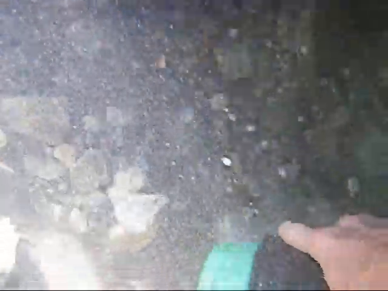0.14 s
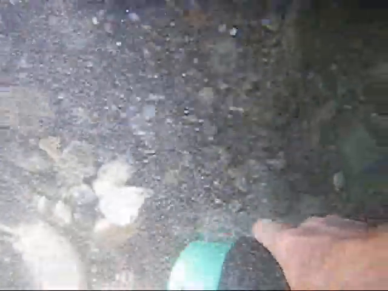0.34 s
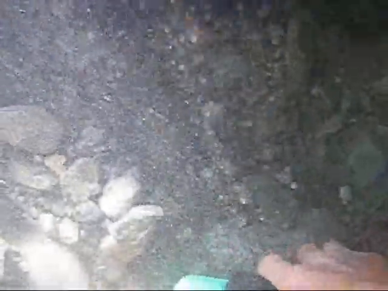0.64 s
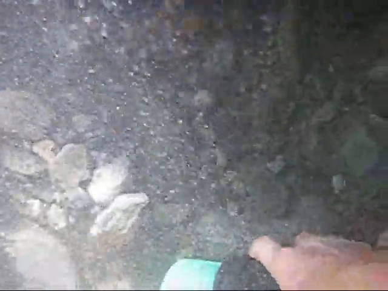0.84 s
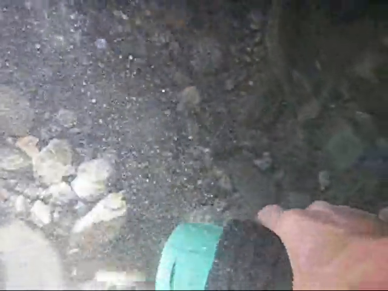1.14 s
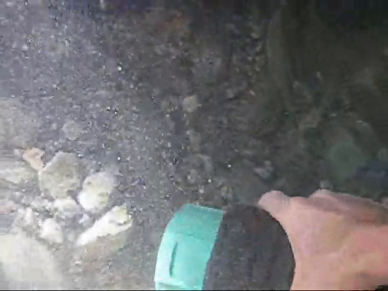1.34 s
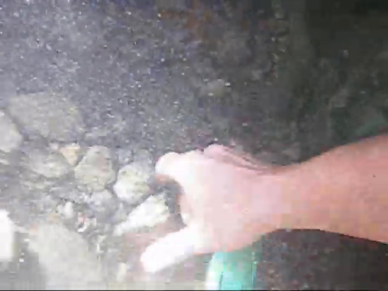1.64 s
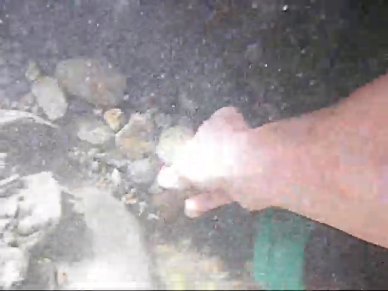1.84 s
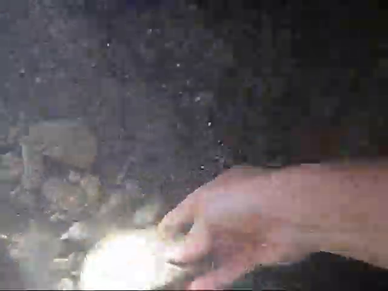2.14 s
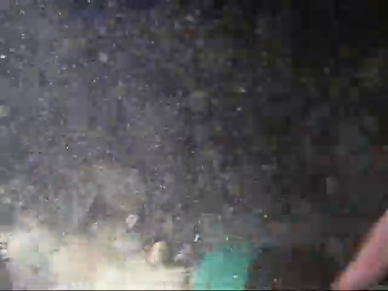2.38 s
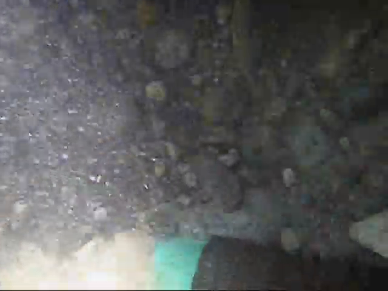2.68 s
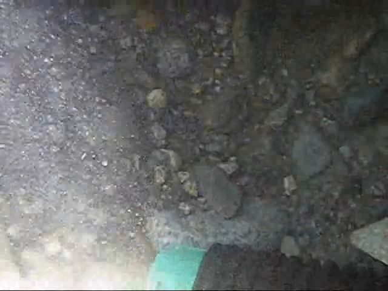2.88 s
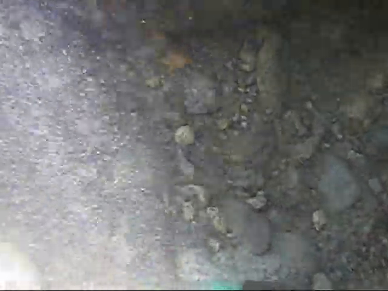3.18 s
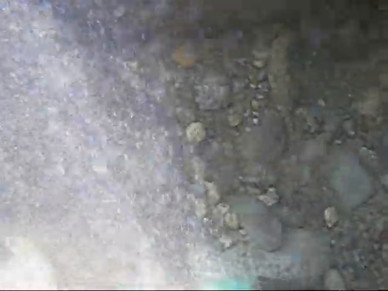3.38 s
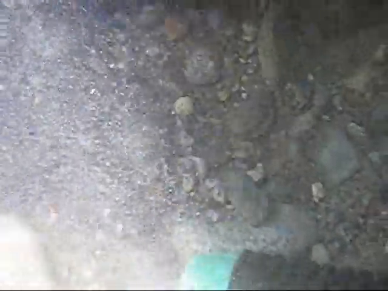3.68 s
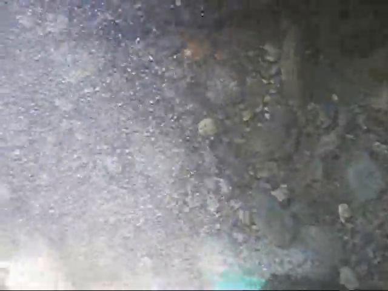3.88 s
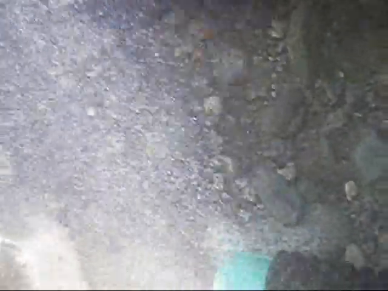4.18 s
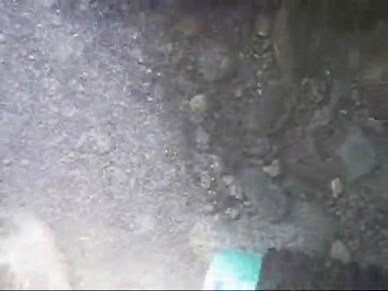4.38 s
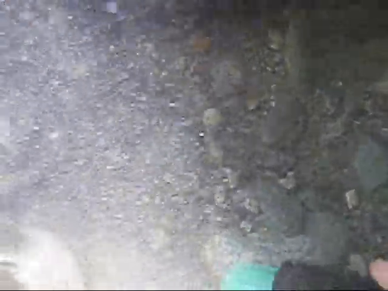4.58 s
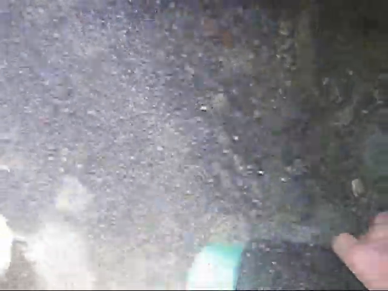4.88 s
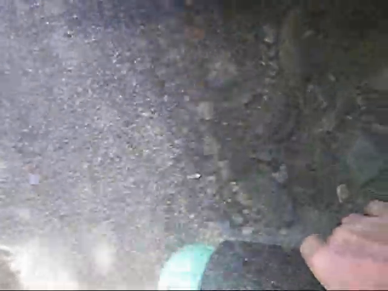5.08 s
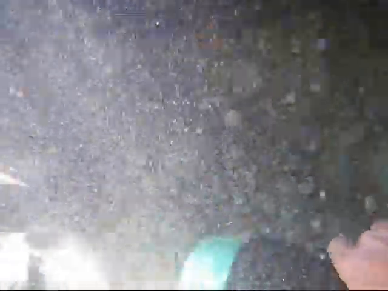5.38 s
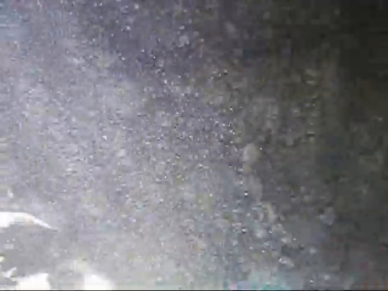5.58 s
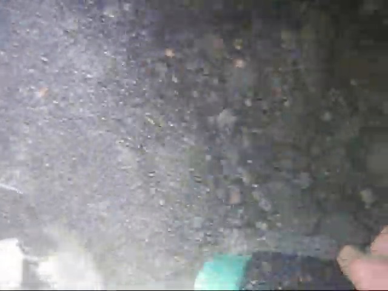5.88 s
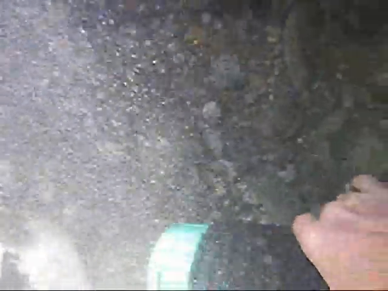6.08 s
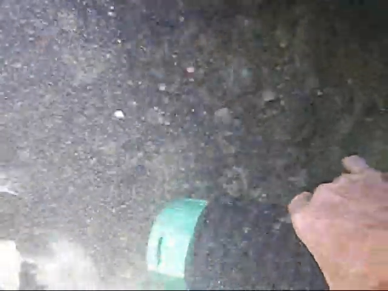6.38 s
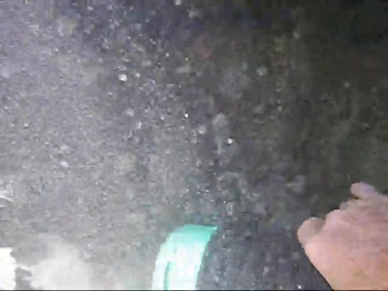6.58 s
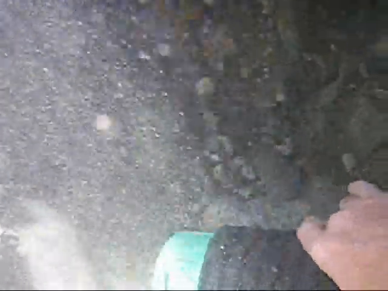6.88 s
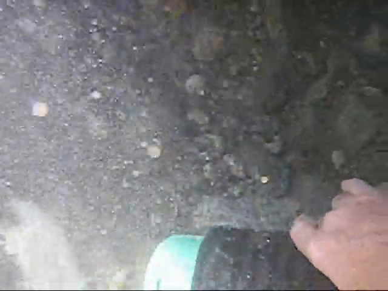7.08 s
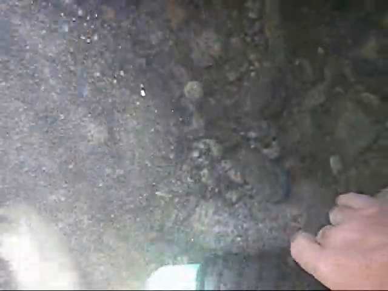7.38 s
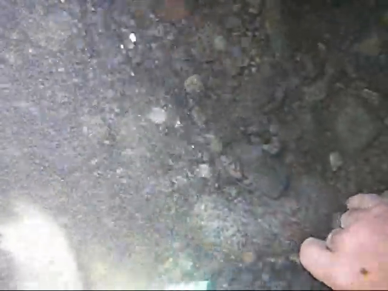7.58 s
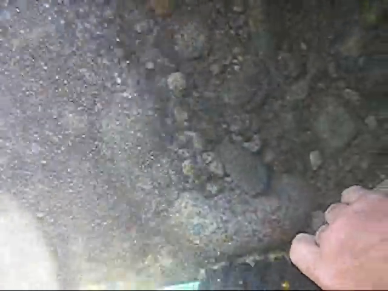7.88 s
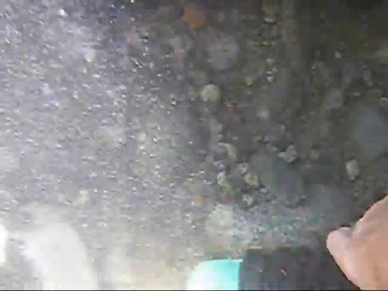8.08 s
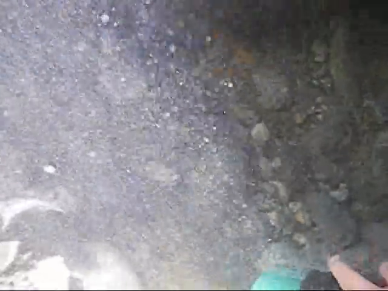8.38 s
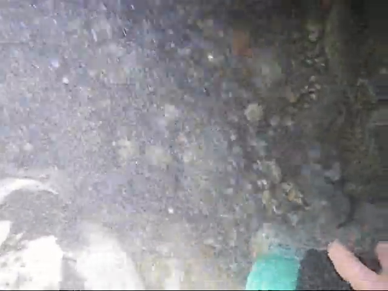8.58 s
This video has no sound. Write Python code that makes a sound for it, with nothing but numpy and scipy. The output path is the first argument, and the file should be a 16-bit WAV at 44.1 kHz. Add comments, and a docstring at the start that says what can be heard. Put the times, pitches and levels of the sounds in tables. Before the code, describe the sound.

Steady submerged suction roars and sloshes through a hose, sand hissing along its wall, with frequent hard stone knocks and sharp pebble ticks.

```python
"""Under water at the mouth of a dredge hose in a creek, heard through a camera's waterproof case.
From the start, random blows ring as the drone, sand and slosh of the flow, over short blips of bubbles and grit.
Stones knock and pebbles click from 0.1 s on, as swelling tones and struck resonances; air glugs from 1 s.
Last, peaks duck the camera's fast gain control, and its coarse sampling adds a glassy fizz."""
import sys
import numpy as np
from scipy import signal
from scipy.fft import rfft, irfft
from scipy.io import wavfile
from scipy.ndimage import uniform_filter1d

SR = 44100
rng = np.random.default_rng(int(sys.argv[2]) if len(sys.argv) > 2 else 0)


def wav_out(sig):
    """Save sig, one row per channel (or a flat mono array), as 16-bit PCM at SR to the path in sys.argv[1]."""
    wavfile.write(sys.argv[1], SR, np.round(np.clip(np.atleast_2d(sig).T, -1, 1) * 32767).astype(np.int16))


N = 385419
TIME_S = np.arange(N) / SR

# What the intake swallows. Each row: time in seconds, relative sand level in dB, relative churn level in dB.
INTAKE_LEVELS = [(0.0, -22, -24.5), (0.8, -23.5, -24), (1.28, -23, -24), (1.92, -24.5, -22.5),
                 (2.16, -23, -26.5), (3.44, -27.5, -31), (3.84, -23.5, -26.5), (4.0, -26.5, -32),
                 (4.4, -25.5, -25), (4.56, -27, -30.5), (4.96, -23.5, -21.5), (5.2, -24, -26.5),
                 (6.16, -27, -29), (6.72, -22, -26), (7.28, -29.5, -30.5), (7.6, -24.5, -25.5),
                 (8.4, -27, -24), (8.72, -22, -25)]
# Hardest stones on the nozzle. Each row: start in seconds, relative force in dB, pitch in Hz,
# choking of the intake in dB (negative: the flow rises).
STONE_KNOCKS = [(0.1047, 9.5, 705, 8), (0.231, 10.5, 736, 1), (0.401, 5, 515, -0.5), (0.583, 8, 770, 1.5),
                (0.7576, 6.5, 680, 2.5), (0.8875, 4, 646, 5), (1.4365, 7.5, 556, 1.5),
                (1.5222, 6.5, 622, 3.5), (1.6607, 11, 630, -5), (1.8785, 5.5, 563, 4.5),
                (1.9629, 4, 630, 0), (2.4283, 7.5, 680, -0.5), (2.4945, 5.5, 610, -1),
                (2.5327, 3.5, 915, 1.5), (2.7612, 7, 650, -4), (2.8687, 6.5, 654, 0.5),
                (2.9195, 4.5, 625, 2), (3.1106, 4.5, 630, 3), (3.2244, 6, 586, -1), (3.7201, 7, 644, -4),
                (3.9435, 2.5, 625, 3.5), (3.9541, 4, 670, 0), (4.5695, 9, 680, 5), (5.1169, 6.5, 646, 1),
                (5.3398, 6, 650, -0.5), (5.428, 5.5, 637, 5), (6.0296, 9.5, 750, -2.5),
                (6.2575, 3, 630, 1.5), (6.4633, 5.5, 680, 0.5), (6.502, 6, 795, -0.5),
                (6.7445, 6, 680, -0.5), (6.9099, 9, 615, -2.5), (7.0128, 7.5, 550, 2.5),
                (7.2273, 4.5, 618, -1), (7.7607, 6.5, 650, 4.5), (8.352, 6, 604, 2), (8.435, 5.5, 660, 2.5)]
# Loudest pebbles clicking in the hose. Each row: start in seconds, level in dB.
PEBBLE_CLICKS = [(0.1032, -7), (0.196, -17), (1.224, -6), (1.266, -7), (1.351, -5.5), (1.591, -9),
                 (1.6564, -4), (2.116, -4), (2.168, -8), (2.241, -22), (2.335, -10), (2.4998, -1.5),
                 (2.71, -7.5), (3.714, -3), (3.911, 1.5), (4.0153, -10), (5.1025, -6), (6.4606, -8),
                 (6.727, -9), (6.8952, -5), (7.095, -12), (7.423, -8), (7.5307, -9)]
# Largest pockets of air. Each row: start in seconds, relative level in dB, pitch at full swell in Hz.
AIR_GLUGS = [(0.955, -1, 277), (1.41, 2, 211), (1.754, -10, 245), (1.871, -2, 263), (2.266, -8, 246),
             (3.365, -5, 246), (4.846, -8, 198), (4.975, 2, 257), (5.002, 8.5, 280), (7.859, -3, 201)]
# Resonance of the case under the flow. Each row: frequency in Hz, relative gain in dB.
DRONE_COLOUR = [(300, -44), (370, -41), (450, -13), (550, 0), (635, 1), (720, -4.5), (840, -11.5),
                (970, -13), (1100, -21), (1280, -32), (1600, -51), (2500, -70.5)]
# Resonance of the hose wall under grains and pebbles. Each row: frequency in Hz, relative gain in dB.
SAND_COLOUR = [(500, -22.5), (1000, -2.5), (1350, -15), (1480, -7), (1590, -3.5), (1740, -13.5), (2070, -4),
               (2200, -10.5), (2390, 5.5), (2600, 4), (2820, 4.5), (3400, 2), (3850, -5.5), (4500, -16.5)]
# Resonance of the water column in the hose. Each row: frequency in Hz, relative gain in dB.
CHURN_COLOUR = [(15, -36), (70, -71), (100, -25.5), (140, -21.5), (195, -13.5), (225, -6), (258, 0.5),
                (305, -4), (345, -18), (450, -20), (900, -67)]
# Colour of the creek's rumble. Each row: frequency in Hz, relative gain in dB.
RUMBLE_COLOUR = [(10, 19), (30, -30), (70, -42), (110, 13), (180, 14), (400, -15)]

FLOW_DB, GRIT_DB, SLOSH_DB = -16, 0.72, -4  # the last two add to the intake's levels
FLOW_SURGE_HZ, GRIT_SURGE_HZ, SLOSH_SURGE_HZ = 29, 41.4, 30  # approximate upper limits
FLOW_SURGE_DB, GRIT_SURGE_DB, SLOSH_SURGE_DB = 1.15, 1.6, 2.0  # rms
CHOKE_PEAK_S = 0.025  # from strike to deepest choking
GRIT_CHOKE_SHARE = 0.79
KNOCK_SWELL_CYCLES = 1.5
GLUG_SWELL_S = 0.0074
SAMPLING_HZ = 8000
STEP_REPEATS = 12
TOP_EDGE_HZ = 15725


def gain_of(db):
    """Decibels to amplitude."""
    return 10 ** (np.asarray(db) / 20)


def evened(x):
    """Scales to an rms of one."""
    return x / np.sqrt(np.mean(x ** 2) + 1e-20)


def add(mix, start_s, sound):
    """Mixes a sound in at start_s, cut off at the end of the mix."""
    part = mix[max(round(start_s * SR), 0):][:len(sound)]
    part += sound[:len(part)]


def wander(top_hz):
    """Random drift of rms one, little of it faster than top_hz."""
    hz = np.fft.rfftfreq(N, 1 / SR)
    spectrum = rfft(rng.standard_normal(N))
    return evened(irfft(spectrum * np.exp(-(hz / top_hz) ** 2), N))


def swell_shape(u):
    """Swell and decay, peaking at one where u is one."""
    return (u * np.exp(1 - u)) ** 2


def response(colour, size=8192):
    """Minimum-phase ringing of a body of the given colour after one push, with a peak of one."""
    colour_hz, colour_db = np.transpose(colour)
    hz = abs(np.fft.fftfreq(size, 1 / SR))
    db = np.interp(np.log(hz + 1), np.log(colour_hz), colour_db)
    log_gain = np.log(gain_of(db))
    tail = np.fft.ifft(np.exp(signal.hilbert(log_gain).conj())).real[:size // 2]
    return tail / abs(tail).max()


def ring(x, colour):
    """Sends x through a body of the given colour; the result has an rms of one."""
    return evened(signal.oaconvolve(x, response(colour))[:N])


def impacts(per_s, spread_db):
    """Random train of blows of unequal size and either sign, with an rms of one."""
    size = gain_of(spread_db * np.minimum(rng.exponential(1, N), 4))
    sign = rng.choice([-1, 1], N)
    struck = rng.random(N) < per_s / SR
    return evened(size * sign * struck)


def blows(rows, level_db, rise):
    """Tones that swell and die within a few cycles; pitch climbs by the share rise per swell time."""
    out, t_s = np.zeros(N), TIME_S[:SR // 16]
    for start_s, db, hz, swell_s in rows:
        u = t_s / swell_s
        pitch_hz = hz * (1 + rise * (np.minimum(u, 4) - 1))  # the climb stops after four swell times
        turns = np.cumsum(pitch_hz) / SR + rng.random()
        add(out, start_s, gain_of(db + level_db) * swell_shape(u) * np.sin(2 * np.pi * turns))
    return out


def blips(level, level_db, hz, scatter, swell_s, spread_db, count):
    """Short blips at random times, each of its own pitch, size and length."""
    when, size, pitch, length = rng.random((count, 4)).T
    start_s = when * N / SR
    pitch_hz = hz * (1 + scatter * (2 * pitch - 1))
    rows = zip(start_s, spread_db * size, pitch_hz, swell_s * (.5 + length))
    return gain_of(level_db) * level * evened(blows(rows, level_db=0, rise=0.026))


def low_cut(x, corner_hz, order):
    """The stiff case passes little below its corner."""
    return signal.sosfilt(signal.butter(order, corner_hz, "high", fs=SR, output="sos"), x)


def suction():
    """Gains of flow, sand and churn: random surges, and a sag or rise as each stone chokes the intake."""
    time_s, sand_db, churn_db = np.transpose(INTAKE_LEVELS)
    choke_db = np.zeros(N)
    choke_shape = swell_shape(TIME_S[:SR // 4] / CHOKE_PEAK_S)
    for start_s, _, _, depth_db in STONE_KNOCKS:
        add(choke_db, start_s, depth_db * choke_shape)
    flow_db = FLOW_DB + FLOW_SURGE_DB * wander(FLOW_SURGE_HZ) - choke_db
    grit_db = GRIT_DB + GRIT_SURGE_DB * wander(GRIT_SURGE_HZ)
    grit_db += np.interp(TIME_S, time_s, sand_db) - GRIT_CHOKE_SHARE * choke_db
    slosh_db = SLOSH_DB + SLOSH_SURGE_DB * wander(SLOSH_SURGE_HZ)
    slosh_db += np.interp(TIME_S, time_s, churn_db) - choke_db
    return gain_of([flow_db, grit_db, slosh_db])


def rumble(level_db=-58):
    """The creek's faint, even rumble: coloured noise."""
    return gain_of(level_db) * ring(rng.standard_normal(N), RUMBLE_COLOUR)


def drone(level, level_db=1.04, gust_db=1.5):
    """Eddies and tumbling gravel keep the case's main resonance ringing."""
    push = impacts(per_s=1800, spread_db=1.1) * gain_of(gust_db * wander(top_hz=55))
    return gain_of(level_db) * level * ring(push, DRONE_COLOUR)


def churn(level, level_db=0.5, surge_db=1.5):
    """The column of water in the hose sloshes at a low pitch."""
    push = impacts(per_s=700, spread_db=2.5) * gain_of(surge_db * wander(top_hz=25))
    return gain_of(level_db) * level * ring(push, CHURN_COLOUR)


def sand(level, level_db=-2.65, clump_db=1.0):
    """Fine grains scour the hose wall in clumps of a few milliseconds."""
    grains = impacts(per_s=3000, spread_db=2.0) * gain_of(clump_db * wander(top_hz=110))
    return gain_of(level_db) * level * ring(grains, SAND_COLOUR)


def bubbles(flow, slosh):
    """Bubbles swept in at random, each a short blip rising a little in pitch."""
    deep = blips(slosh, level_db=-1.5, hz=470.5, scatter=0.079, swell_s=0.006, spread_db=10, count=200)
    large = blips(flow, level_db=-1.44, hz=602, scatter=.12, swell_s=0.0051, spread_db=4, count=600)
    small = blips(flow, level_db=-12.0, hz=897, scatter=0.11, swell_s=0.003, spread_db=7, count=200)
    return deep + large + small


def coarse_grit(level):
    """Coarse grains swept in at random, each a very short, high blip."""
    return blips(level, level_db=-10.0, hz=2953, scatter=0.18, swell_s=0.0011, spread_db=30, count=900)


def small_pebbles(level, level_db=-8.5):
    """Many lesser pebbles tick on the hose wall at random, carried along with the sand."""
    return gain_of(level_db) * level * ring(impacts(per_s=70, spread_db=3.0), SAND_COLOUR)


def small_stones(level):
    """Lesser stones knock at random, each a short blip through the case."""
    taps = blips(level, level_db=-12.0, hz=680, scatter=0.15, swell_s=0.0018, spread_db=14, count=45)
    return low_cut(taps, corner_hz=337, order=3)


def glugs():
    """Round, low bubbles that rise a little in pitch."""
    rows = [(*row, GLUG_SWELL_S) for row in AIR_GLUGS]
    return low_cut(blows(rows, level_db=-10.0, rise=0.037), corner_hz=98, order=3)


def pebbles(scrape_db=-14, scrape_s=0.0058):
    """Each pebble strikes the hose wall and scrapes on briefly, ringing it as the sand does."""
    push, t_s = np.zeros(N), TIME_S[:SR // 80]
    for start_s, db in PEBBLE_CLICKS:
        strike = t_s == 0
        scrape = gain_of(scrape_db) * np.exp(-t_s / scrape_s) * rng.standard_normal(len(t_s))
        add(push, start_s, gain_of(db) * (strike + scrape))
    return signal.oaconvolve(push, response(SAND_COLOUR))[:N]


def knocks():
    """Hard, short knocks of stone on the nozzle; the higher the pitch, the quicker the knock."""
    rows = [(start_s, db, hz, KNOCK_SWELL_CYCLES / hz) for start_s, db, hz, _ in STONE_KNOCKS]
    return low_cut(blows(rows, level_db=-5.0, rise=0), corner_hz=367, order=3)


def scene():
    """The intake's flow with its bubbles, grit, glugs, clicks and knocks."""
    flow, grit, slosh = suction()
    water = rumble() + drone(flow) + churn(slosh) + bubbles(flow, slosh)
    grains = sand(grit) + coarse_grit(grit) + small_pebbles(grit)
    strikes = small_stones(flow) + pebbles() + knocks()
    return (water + grains + glugs() + strikes)[None]


def gain_control(x, threshold_db=-6.5, share=0.8, recovery_db_per_s=125, attack_s=0.0018, makeup_db=1.0):
    """Peaks pull the gain down within milliseconds; it creeps back over a few hundredths of a second."""
    peak_db = 20 * np.log10(abs(x) + 1e-9)
    fall_db = TIME_S * recovery_db_per_s
    held_peak_db = np.maximum.accumulate(peak_db + fall_db) - fall_db
    over_db = np.maximum(held_peak_db - threshold_db, 0)
    r = np.exp(-1 / (attack_s * SR))
    smooth_over_db = signal.lfilter([1 - r], [1, -r], over_db)
    return x * gain_of(makeup_db - share * smooth_over_db)


def record(dry, hiss_db=-36.5, corner_hz=60):
    """Gain control, overload, then slow sampling whose held steps mirror the sound into the treble."""
    loud = low_cut(gain_control(dry[0]), corner_hz, order=1)
    # every second sample dropped unfiltered: the treble folds down
    slow = signal.resample_poly(loud, 2 * SAMPLING_HZ, SR)[::2]
    steps = np.repeat(np.clip(slow, -.95, .95), STEP_REPEATS)
    held = signal.resample_poly(steps, SR, STEP_REPEATS * SAMPLING_HZ)[:N]
    # faint white hiss follows the level
    envelope = evened(np.sqrt(abs(uniform_filter1d(held ** 2, size=200))))
    hissing = held + gain_of(hiss_db) * envelope * rng.standard_normal(N)
    top_cut = signal.firwin(1023, TOP_EDGE_HZ, window=("kaiser", 9), fs=SR)
    return signal.oaconvolve(hissing, top_cut, "same")[None]


dry = scene()
out = record(dry)
wav_out(out)
```